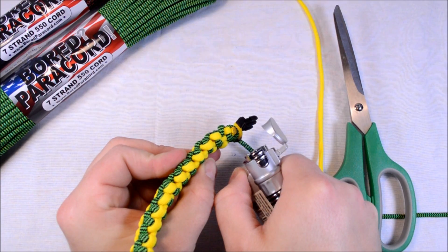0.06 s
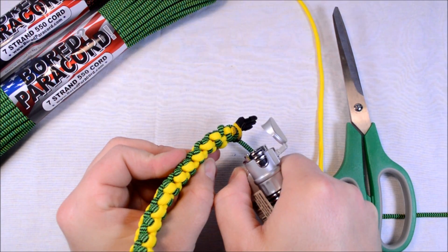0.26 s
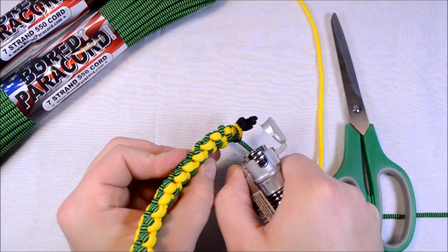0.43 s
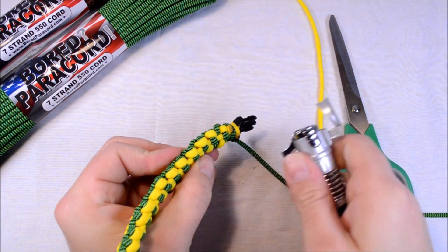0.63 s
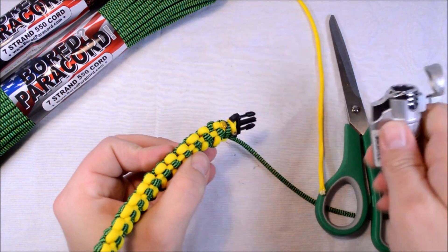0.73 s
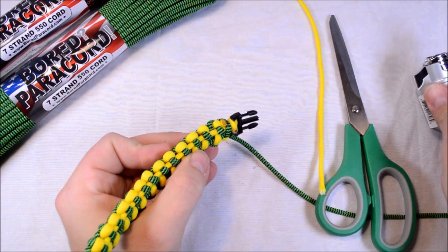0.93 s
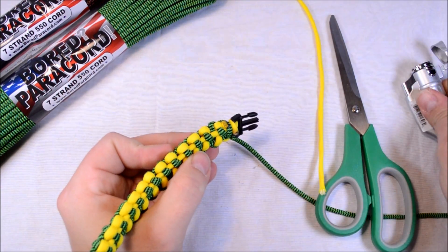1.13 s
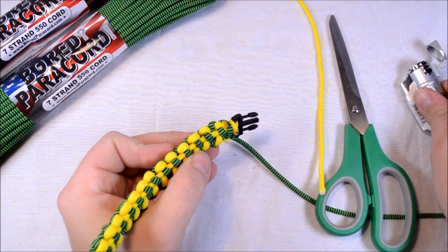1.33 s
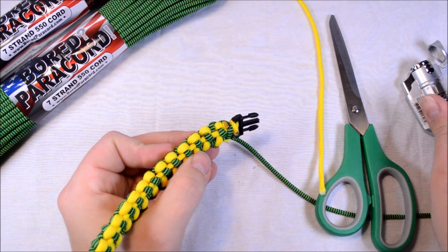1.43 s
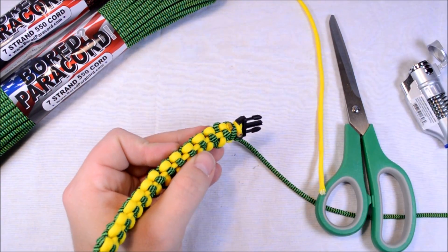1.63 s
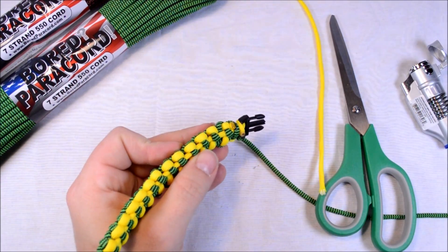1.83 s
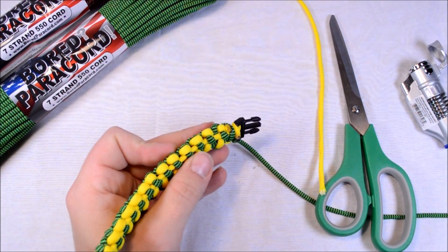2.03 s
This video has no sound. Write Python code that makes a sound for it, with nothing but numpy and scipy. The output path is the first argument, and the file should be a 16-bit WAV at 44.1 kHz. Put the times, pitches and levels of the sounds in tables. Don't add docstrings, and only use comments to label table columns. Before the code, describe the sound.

Close, mono: the rushing hiss of a gas lighter, a sharp click and table thump, gritty scraping on cloth as the hiss fades, a quiet gap with faint fan whirr, then dull bumps and a tiny rattle.

```python
import sys
import numpy as np
from scipy import signal
from scipy.fft import rfft, irfft, next_fast_len
from scipy.io import wavfile
from scipy.ndimage import uniform_filter1d, map_coordinates

SR = 44100
rng = np.random.default_rng(int(sys.argv[2]) if len(sys.argv) > 2 else 0)


def wrap_up_sound(samples):
    columns = np.atleast_2d(samples).T
    tamed = np.clip(columns, -1, 1)
    steps = np.round(tamed * 32767).astype(np.int16)
    wavfile.write(sys.argv[1], SR, steps)


def field_ratio(decibels):
    return 10 ** (np.asarray(decibels, dtype=float) / 20)


N = 91816

MODE_HZ = [100, 143, 202, 262, 301, 345, 404, 468, 523, 621, 705, 805, 915, 1070, 1280]
MODE_T60 = [0.49, 0.41, 0.2, 0.13, 0.21, 0.14, 0.15, 0.16, 0.11, 0.13, 0.14, 0.11, 0.12, 0.098, 0.084]
MODE_DB = [
    [-8, 6.5, 5.9, -4.5, 4.5, -2.5, 3.5, -2, 2, -3, -4.5, -3, -4, -4, -9],
    [-20, -4.5, 5, -12, 0.5, 3, 0.5, 2, 1, -9.5, -3, -9.5, -2.5, -4, -16],
    [-18, 1, 5, -5.5, -6, 5.5, -3.5, -1.5, -0.5, -4, -7.5, -1.5, -10, 6, -9],
]


def unit(x):
    return x / np.sqrt(np.mean(x ** 2) + 1e-20)


def curve(rows, column=1):
    return np.interp(np.arange(N) / SR, np.array(rows)[:, 0], np.array(rows)[:, column])


def wobble(rate):
    knots = rng.standard_normal(int(N * rate / SR) + 4)
    return map_coordinates(knots, [np.arange(N) * rate / SR])


def filtered(x, response):
    m = next_fast_len(len(x) + SR // 2)
    return irfft(rfft(x, m) * response(np.fft.rfftfreq(m, 1 / SR)), m)[:len(x)]


def colour(spectrum, bumps):
    slope_hz, slope_db = np.transpose(spectrum)

    def response(hz):
        slope = np.interp(np.log(hz + 1), np.log(slope_hz), slope_db)
        bells = sum(g / (1 + (2 * (hz - c) / w) ** 2) for c, w, g in bumps)
        return field_ratio(slope + bells)
    return response


def resonant(peaks):
    def response(f):
        return sum((-1) ** k * field_ratio(db) * 1j * f * w / (c * c - f * f + 1j * f * w)
                   for k, (c, w, db) in enumerate(peaks))
    return response


def patchy(patchy_db):
    z = signal.stft(rng.standard_normal(N + 512), nperseg=512)[2]
    field = uniform_filter1d(rng.standard_normal(z.shape), 5, 0)
    field = uniform_filter1d(field, 10, 1)
    return signal.istft(z * field_ratio(patchy_db * unit(field)), nperseg=512)[1][:N]


def below_treble(x):
    return filtered(x, lambda hz: 1 / (1 + (hz / 3870) ** 4))


def flame():
    # start_s, level_db, treble_db, extra_path_cm
    motion = [(0, -35, 0, 8.9), (.1, -35.5, 1, 9.2), (.6, -34.5, -1, 9.34), (.65, -33.5, -3, 9.5),
              (.74, -36.5, 2, 9.1), (.8, -39.5, 3, 8.5), (1.03, -37.5, -6, 9.7), (1.08, -41.5, -1.5, 16.3),
              (1.2, -39.5, -10.5, 14.6), (1.3, -46.5, -4, 14.4), (1.36, -46, -18, 16.3),
              (1.44, -55, -4, 13), (1.55, -77, -30, 15), (2.1, -79, -11, 14)]
    # frequency_hz, density_db
    jet_slope = [(60, -39), (150, -14.5), (300, -7), (700, -8), (2230, -8), (4390, -20), (9600, -20),
                 (15700, -35)]
    # frequency_hz, width_hz, level_db
    facing = [(796, 43, 13), (940, 105, 8), (1434, 34, 10.5), (1579, 13, 10), (2040, 430, 1),
              (2810, 23, 11), (3530, 570, 8), (4400, 210, -8), (4930, 1800, 3.5), (6740, 750, -2.5),
              (8700, 300, -13), (9500, 1100, 3), (10930, 1150, 11.5), (1300, 52, -4.5)]
    # frequency_hz, width_hz, level_db
    averted = [(795, 82, 10), (940, 124, 7.5), (1441, 22, 11), (1653, 38, 11), (2080, 590, 5),
               (2800, 100, 10), (3600, 250, 1), (4770, 1400, 5), (6600, 1200, 1), (8500, 400, -9),
               (9800, 500, 4), (10900, 1000, 10)]
    turn_s = (0.65, 0.83)
    gas = patchy(patchy_db=.6)
    away = np.interp(np.arange(N) / SR, turn_s, [0, 1])
    jet = (1 - away) * filtered(gas, colour(jet_slope, facing))
    jet = jet + away * filtered(gas, colour(jet_slope, averted))
    delay = curve(motion, column=3) / 34300 * SR
    mirror = map_coordinates(jet, [np.arange(N) - delay], mode="mirror")
    jet = unit(jet - .35 * mirror)
    low = below_treble(jet)
    tilted = low + (jet - low) * field_ratio(curve(motion, column=2))
    return tilted * field_ratio(curve(motion) + 0.57 * wobble(60.8))


def scrape():
    # start_s, length_s, level_db, treble_db
    strokes = [(0.755, 0.26, -38.5, 1), (0.814, 0.051, -47, 10.5), (0.87, 0.086, -36, -1.5),
               (0.892, 0.015, -55, 4), (0.954, 0.11, -40, 1.5), (1.052, 0.14, -47, 0.5),
               (1.185, 0.053, -42, -6), (1.29, 0.011, -41.5, -18), (1.27, 0.13, -52, -15),
               (1.448, 0.015, -54.5, 7.5), (1.512, .04, -62, 11), (1.903, 0.032, -54, 7),
               (1.955, 0.083, -62, 5), (1.921, 0.17, -57, 4)]
    # frequency_hz, density_db
    rub_slope = [(150, -35), (400, -8), (1020, -14), (1570, -5.5), (2620, -14), (6000, -15), (10800, -21.5),
                 (15700, -46)]
    # frequency_hz, width_hz, level_db
    shell = [(1207, 140, 10.4), (1370, 53, 7.3), (1620, 39, 2.8), (2060, 460, 6.9), (2920, 58, 7.7),
             (3760, 380, 5.9), (4260, 260, 4.6), (6630, 310, 4.1), (7800, 140, 1.2), (10200, 230, 8.2),
             (12800, 150, 5)]
    grains_per_s, grain_db = 2000, 2.2
    hit = rng.random(N) < grains_per_s / SR
    grains = hit * field_ratio(grain_db * rng.exponential(size=N)) * rng.standard_normal(N)
    fibres = unit(grains) + 1.5 * patchy(patchy_db=4)

    roll = np.pi / 4 * (1 + np.tanh(1.5 * wobble(16)))
    flat, rolled = [filtered(fibres, colour(rub_slope, np.array(shell) * [k, 1, 1])) for k in (.94, 1.1)]
    rub = unit(np.cos(roll) ** 2 * flat + np.sin(roll) ** 2 * rolled)
    low = below_treble(rub)

    t = np.arange(N) / SR
    body, top = np.zeros(N), np.zeros(N)
    for start, length, db, treble_db in strokes:
        arc = np.sin(np.pi * np.clip((t - start) / length, 0, 1) ** 0.78)
        pressure = field_ratio(db) * np.abs(arc) ** 0.69 * (t > start) * (t < start + length)
        body += pressure
        top += field_ratio(treble_db) * pressure
    body, top = uniform_filter1d([body, top], size=60)
    return (low * body + (rub - low) * top) * field_ratio(0.7 * wobble(70.17))


def knocks():
    # start_s, peak_db, contact_s, bass_db, ring_length_factor
    blows = [(0.603, -6, 0.00087, -2, 0.47), (0.6049, -22.5, 0.00041, 5, 0.56),
             (0.622, -17, 0.0015, -10, 0.39), (0.6512, -30, 0.00088, -4, 0.57),
             (1.1889, -19, 0.00053, 1, 0.67), (1.29, -45, 0.0035, -9, 0.25),
             (1.844, -37.5, 0.0023, -21, 0.46), (1.9015, -35, .0015, -7, .4),
             (1.9043, -14.5, 0.0016, -0.5, 0.45), (1.9198, -20.5, 0.0014, -17, 0.42),
             (1.938, -27, 0.0017, 3, 0.44), (1.954, -37, 0.0015, -5, 0.6), (1.971, -35, 0.0014, 6.5, 0.57),
             (1.983, -27.5, 0.001, 2, 0.23), (2.008, -29, 0.0029, 0, 0.25)]
    # frequency_hz, level_db
    fronts = [
        (432, 12.5),
        (418, 14),
        (366, 10),
    ]
    moves_s = [1, 1.6]
    travel_s, swell_s = .0002, .002
    out, t = np.zeros(N + SR), np.arange(SR // 2) / SR
    for start, db, contact, bass_db, long in blows:
        place = np.searchsorted(moves_s, start)
        front_hz, front_db = fronts[place]
        ring = field_ratio(front_db - 60 * t / .02) * np.sin(2 * np.pi * front_hz * t) * (1 - np.exp(-t / .0008))
        spot = .7 * rng.standard_normal(len(MODE_HZ))
        for hz, t60, g, spot_db in zip(MODE_HZ, MODE_T60, MODE_DB[place], spot):
            u = np.maximum(t - travel_s * np.sqrt(400 / hz), 0)
            decay = field_ratio(g + spot_db + bass_db * (hz < 180) - 60 * u / (t60 * long))
            ring = ring + decay * np.sin(2 * np.pi * hz * u) * (1 - np.exp(-u / swell_s))
        push = np.sin(np.pi * np.clip(t[:900] / contact, 0, 1)) ** 2
        thump = np.convolve(ring, push / push.sum())[:len(t)]
        out[round(start * SR):][:len(t)] += field_ratio(db - 4.5) * thump
    return out[:N]


def hand_drag():
    # start_s, level_db
    drag_level = [(1.2, -57), (1.27, -47.5), (1.35, -53.5), (1.47, -49), (1.51, -62), (1.62, -71),
                  (1.9, -56.5), (1.97, -56), (2.08, -54)]
    rubbing = rng.standard_normal(N) * field_ratio(curve(drag_level) + 4.5 * wobble(39.83))
    modes = [(hz, 4.9 / t60, g) for hz, t60, g in zip(MODE_HZ, MODE_T60, MODE_DB[0]) if hz < 650]
    return field_ratio(19.5) * filtered(rubbing, resonant(modes))


def sway():
    start_s, length_s, pitch_hz, level_db = .695, .09, 97, -29
    u = np.clip((np.arange(N) / SR - start_s) / length_s, 0, 1)
    return field_ratio(level_db) * np.sin(np.pi * u) * np.sin(2 * np.pi * pitch_hz * length_s * u)


def tabletop():
    motion = knocks() + hand_drag() + sway()
    return filtered(motion, lambda f: (1j * f / (112 + 1j * f)) ** 2)


def bursts(rows, low, top):
    out, t = np.zeros(N + SR), np.arange(SR // 10) / SR
    for start, db, t60, top_db in rows:
        burst = rng.standard_normal(len(t)) * field_ratio(db - 60 * t / t60) * (1 - np.exp(-t / .0004))
        ringing = filtered(burst, resonant(low)) + field_ratio(top_db) * filtered(burst, resonant(top))
        out[round(start * SR):][:len(t)] += 3.62 * ringing
    return out[:N]


def metal_clicks():
    # start_s, level_db, t60_s, treble_db
    click_rows = [
        (.6064, -17, .009, 2),
        (.610, -33, .03, -4),
    ]
    # frequency_hz, width_hz, level_db
    metal_low = [(1690, 900, -13), (2780, 480, 2.5), (4100, 240, 6.5), (5460, 1300, -7.5)]
    metal_high = [(9610, 1700, 2), (10820, 550, 9.5), (13000, 360, 0.5)]
    return bursts(click_rows, metal_low, metal_high)


def fibre_snaps():
    # start_s, level_db, t60_s, treble_db
    snap_rows = [(.7487, -31.5, 0.011, 6), (.8245, -44, 0.019, -9), (.833, -42, 0.016, 4),
                 (.8844, -40, 0.011, 9.5), (.9, -37, 0.014, -8), (.929, -39, .01, 2), (1.03, -39, .02, 0),
                 (1.193, -46, .01, -8), (1.2, -46, .015, -8), (1.456, -54, 0.017, -3), (.875, -47, .01, -2),
                 (.912, -40, .01, 2), (.94, -43, .01, -3), (.968, -49, 0.009, 2), (1.293, -53, 0.0092, -10),
                 (1.914, -54, .015, 11), (1.92, -57, .012, 8), (1.966, -57, .012, 8), (1.985, -57, .012, 4),
                 (2.001, -54, .012, 2)]
    # frequency_hz, width_hz, level_db
    fibre_low = [(3930, 1400, -6), (5700, 1200, 3)]
    fibre_high = [(7760, 1900, -5), (10500, 2500, -9.5)]
    return bursts(snap_rows, fibre_low, fibre_high)


def tool_rattle():
    # start_s, level_db, t60_s, treble_db
    tick_rows = [(2.0495, -45, 0.016, 1), (2.052, -32.5, 0.011, -13), (2.0555, -34.5, 0.015, -5),
                 (2.063, -57, 0.022, 4), (2.07, -59, 0.018, -2)]
    # frequency_hz, width_hz, level_db
    tool_low = [(2220, 790, -5), (4830, 550, 4.5), (5450, 810, 3.5)]
    tool_high = [(7400, 890, -22), (9340, 610, 13.5), (13400, 1500, -20)]
    return bursts(tick_rows, tool_low, tool_high)


def echo(x):
    t = np.arange(SR // 3) / SR
    tail = rng.standard_normal(len(t)) * field_ratio(-60 * t / .32) * (t > .004)
    answer = signal.fftconvolve(x, tail / np.linalg.norm(tail))[:N]
    return filtered(answer, lambda hz: 1 / (1 + (hz / 5000) ** 2))


def room_tone():
    # frequency_hz, density_db
    rush_slope = [(25, -62), (150, -37), (270, -18.5), (500, -19.5), (1000, -15.5), (2000, -25.5),
                  (4500, -31), (15700, -34.5)]
    # frequency_hz, width_hz, level_db
    fan_bands = [(269, 18, 9), (457.2, 16, 17), (1420, 130, 3), (2680, 130, 13), (3080, 49, 8),
                 (3740, 240, 14)]
    # frequency_hz, density_db
    rumble_slope = [(20, -15), (60, -15), (140, -7), (300, -29.5), (600, -42)]
    t = np.arange(N) / SR
    hum = field_ratio(-57 + 1.2 * wobble(18)) * np.sin(2 * np.pi * 267.3 * t)
    whine = field_ratio(-67.5) * np.sin(2 * np.pi * 15668 * t)
    rumble = field_ratio(-62) * unit(filtered(rng.standard_normal(N), colour(rumble_slope, [])))
    rush = field_ratio(-51) * unit(filtered(patchy(patchy_db=.7), colour(rush_slope, fan_bands)))
    return rush + np.sqrt(2) * (hum + whine) + rumble


def scene():
    hits = metal_clicks() + tool_rattle() + fibre_snaps()
    thumps = tabletop()
    reflected = field_ratio(-7) * echo(hits + 0.57 * thumps)
    mix = flame() + scrape() + thumps + hits + reflected + room_tone()
    return np.array([mix, mix])


def roll_off(x):
    return signal.sosfilt(signal.butter(12, 16050, fs=SR, output="sos"), x)


def record(dry):
    mix = np.array([filtered(c, lambda hz: hz < 15750) for c in dry])
    return roll_off(mix)


dry = scene()
out = record(dry)
wrap_up_sound(out)
```